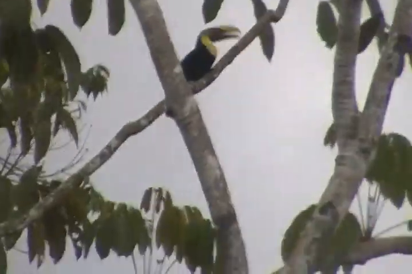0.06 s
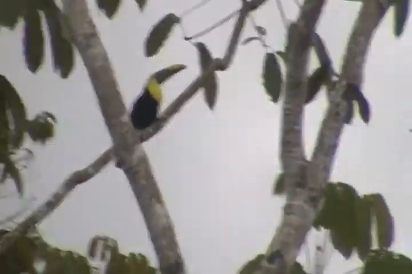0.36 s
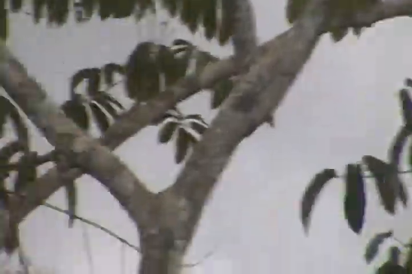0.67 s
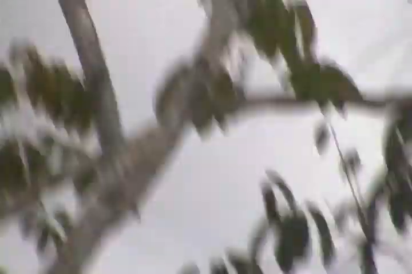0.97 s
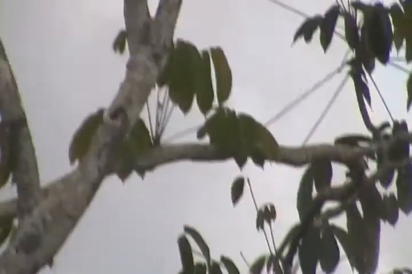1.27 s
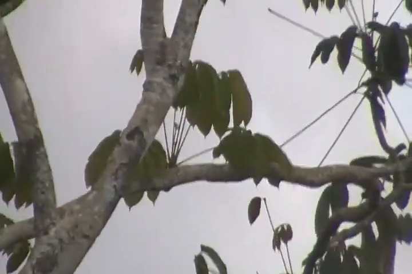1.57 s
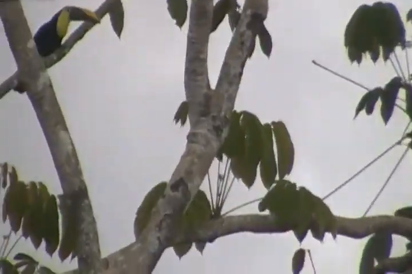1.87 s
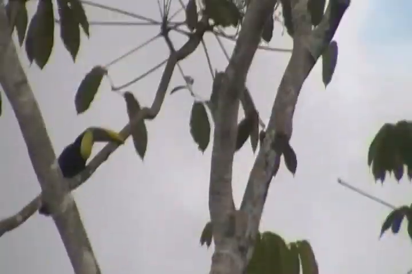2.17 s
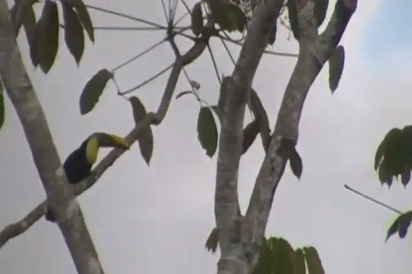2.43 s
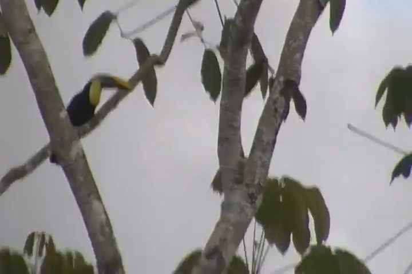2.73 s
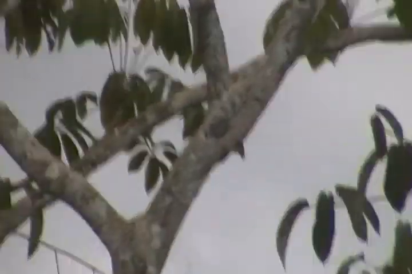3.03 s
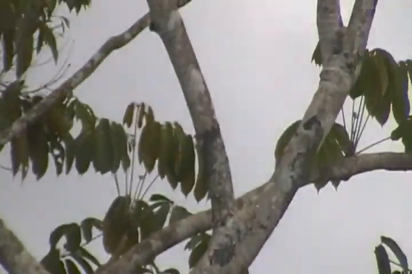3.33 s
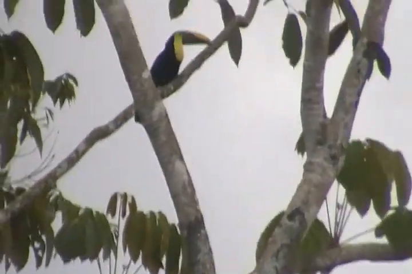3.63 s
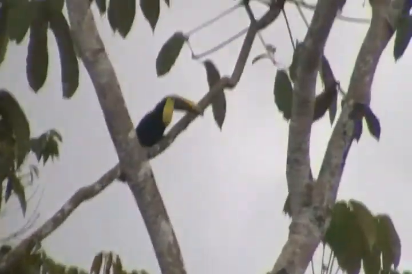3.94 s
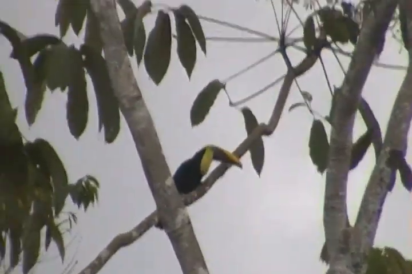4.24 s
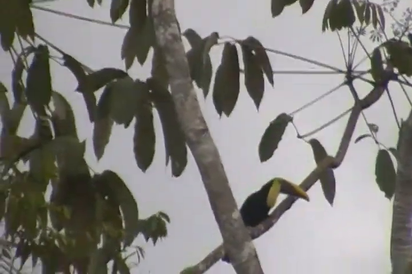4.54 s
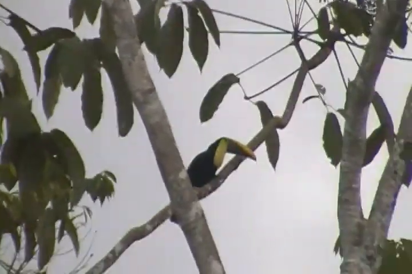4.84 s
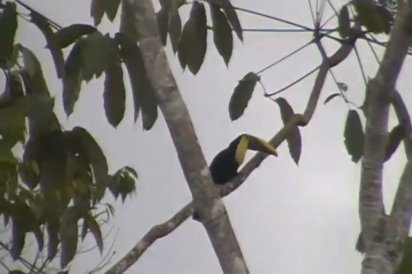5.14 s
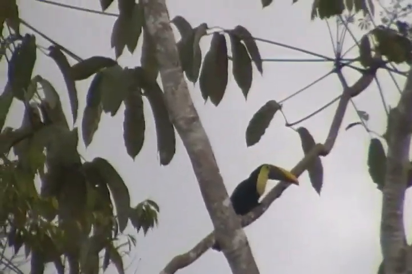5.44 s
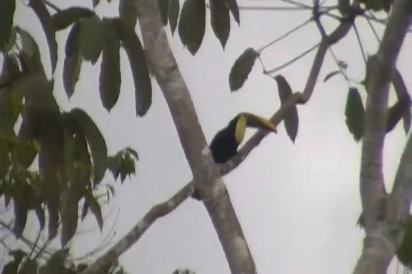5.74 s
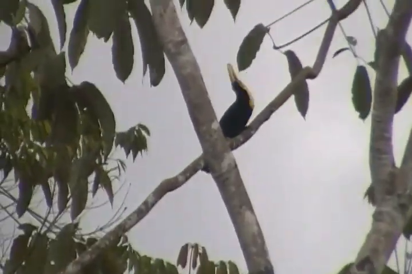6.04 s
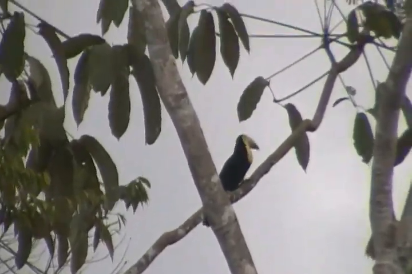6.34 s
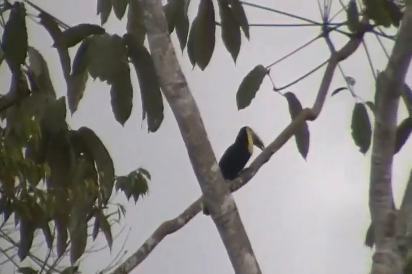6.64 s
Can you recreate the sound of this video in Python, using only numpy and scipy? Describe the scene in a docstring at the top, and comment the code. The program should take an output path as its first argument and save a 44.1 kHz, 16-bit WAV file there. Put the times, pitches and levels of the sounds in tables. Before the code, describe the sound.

Outdoors among trees, a steady deep rush, a faint engine-like drone and a thin insect hiss lie under two loud toucans in front of the microphone. They call in three phrases of yelps, wails and quick yips, with occasional bill snaps and a short echo. A far rooster crows as the first phrase trails off, then a small bird gives two faint whistles just before the second phrase.

```python
"""Two toucans yelp in a treetop, a higher and a lower voice overlapping in three bursts of notes.
Each note is a tone from the syrinx (a bird's voice box) that turns rough as it falls. Bills snap,
and trunks and leaves scatter the sound back. Far off, a rooster crows and a small bird whistles twice.
Under it all lie a steady outdoor rush, a low engine-like drone and a thin band of insects."""
import sys
import numpy as np
from scipy import signal
from scipy.fft import rfft, irfft
from scipy.io import wavfile
from scipy.ndimage import uniform_filter1d, minimum_filter1d

SR = 44100
rng = np.random.default_rng(int(sys.argv[2]) if len(sys.argv) > 2 else 0)


def wav_record(signal):
    """Record a signal, one row per channel, as 16-bit PCM in the file named by sys.argv[1]."""
    frames = np.transpose(np.atleast_2d(signal))
    bounded = np.clip(frames, -1, 1)
    # unit amplitude maps onto the largest positive 16-bit level
    quanta = np.round(bounded * 32767).astype(np.int16)
    wavfile.write(sys.argv[1], SR, quanta)


N = 299880
TIME = np.arange(N) / SR

# The bright noise of breath and of bill snaps. Each row: frequency in Hz, level in dB.
HISS_COLOUR = [(1500, -10), (3500, 8.5), (7800, 3), (12000, -49)]


def undb(db):
    """Turn decibels into a factor to multiply by."""
    return 10 ** (np.asarray(db) / 20)


def unit(x):
    """Scale a signal to an average strength (rms) of 1."""
    return x / np.sqrt(np.mean(x ** 2))


def db_at(hz, points):
    """Read the level at a frequency from a curve of (Hz, dB) points."""
    point_hz, db = np.transpose(points)
    return np.interp(np.log(np.maximum(hz, 1)), np.log(point_hz), db)


def colour(x, points):
    """Make each frequency louder or softer along a curve of (Hz, dB) points."""
    size = x.shape[-1]
    return irfft(rfft(x) * undb(db_at(np.fft.rfftfreq(size, 1 / SR), points)), size)


def wander(rate, size=N):
    """A smooth random wobble, about 1 in size, that takes a new value `rate` times a second."""
    steps = np.arange(size) / SR * rate
    knots = 1.15 * rng.standard_normal(N // 100)
    i = steps.astype(int) % (len(knots) - 1)
    part = steps % 1
    return knots[i] + np.diff(knots)[i] * part * part * (3 - 2 * part)


def stereo(mid, side):
    """Make left and right from what they share (mid) and how they differ (side)."""
    return np.array([mid + side, mid - side])


def add(track, start, sound):
    """Mix a sound into a track at `start` seconds."""
    i = int(start * SR)
    track[i:i + len(sound)] += sound[:N - i]


def outdoor_rush(level_db=-36):
    """Steady, deep noise that spreads wider toward the treble."""
    # Each row: frequency in Hz, level of the noise in dB.
    rush_colour = [(22, -16), (45, -2), (100, -2.5), (130, -9), (350, -15.5), (950, -23.5), (5500, -36),
                   (8000, -36.5), (11500, -45), (12600, -62)]
    # Each row: frequency in Hz, level of the side against the mid in dB.
    width = [(100, -21), (500, -11), (2000, -5.5), (6000, -5), (12000, -0.5)]
    mid, side = colour(rng.standard_normal((2, N)), rush_colour)
    return unit(stereo(mid, colour(side, width))) * undb(level_db)


def drone(waver_db=2, drift=0.0185):
    """Two low tones waver in level and pitch, like an engine."""
    # Each row: pitch in Hz, level in dB.
    tones = [(49.5, -46.5), (86.1, -44.5)]
    out = np.zeros(N)
    for hz, db in tones:
        gain = undb(db + waver_db * wander(7.6))
        phase = 2 * np.pi * np.cumsum(hz * (1 + drift * wander(5))) / SR
        out += gain * unit(np.sin(phase))
    return out


def insects(level_db=-53):
    """An insect chorus blends into a thin, high, flickering band of noise."""
    # Each row: frequency in Hz, level in dB.
    band = [(5600, -28), (6620, -8), (6731, 0), (6840, -7), (8300, -26)]
    return unit(colour(rng.standard_normal((2, N)), band)) * undb(level_db + 2 * wander(20))


def rasp(start_s=0.15, rise_s=0.018, decay_s=0.022, level_db=-25):
    """A short, toneless rasp comes before the first note."""
    # Each row: frequency in Hz, level in dB.
    rasp_colour = [(1500, -30), (2600, -9), (5700, 6.5), (6800, -5.5), (9000, -33.5)]
    out, t = np.zeros(N), TIME[:SR // 2]
    envelope = np.minimum(t / rise_s, 1) * np.exp(-np.maximum(t - rise_s, 0) / decay_s)
    noise = unit(colour(rng.standard_normal(len(t)), rasp_colour))
    add(out, start_s, undb(level_db) * envelope * noise)
    return out


def toucan_note(glide, effort, length, pitch_hz, level_db, second_db, third_db, upper_db, swell_db,
                depth=1, bloom_db=0, attack_s=0.0062, release_s=0.012, crack_s=0.0027, rattle_s=0.04):
    """The syrinx cracks into tone, runs clean while taut, and rattles and hisses as it goes slack."""
    # How throat and bill colour the tone. Each row: frequency in Hz, gain in dB.
    throat = [(900, -19), (1200, 1.5), (1500, 4), (2100, -9.5), (2450, -5.5), (2850, -7), (3150, 1),
              (3500, -9.5), (3900, -2), (4350, -0.5), (5100, -9), (5800, -6), (8500, -24), (12000, -49)]
    t = np.arange(int((length + release_s) * SR)) / SR
    progress = t / length
    knots, *columns = np.hstack([glide, effort]).T
    ratio, effort_db, overtone_db = (np.interp(progress, knots, column) for column in columns)
    fall = np.clip((1 - ratio) / .15, 0, 1)
    # The deeper the final fall, the rougher the end.
    end_rattle = fall[-1] * np.clip(1 + (t - length) / rattle_s, 0, 1)
    slack = end_rattle + .5 * np.exp(-t / crack_s)
    jitter = (.005 + .019 * slack) * wander(600, len(t))
    hz = pitch_hz * ratio ** depth * (1 + jitter)
    phase = 2 * np.pi * np.cumsum(hz) / SR
    harmonics_db = [0, overtone_db + second_db, overtone_db + third_db + bloom_db * fall]
    # The top five harmonics grow as the rattle sharpens the pulses.
    harmonics_db += [overtone_db + upper_db + 5 * slack] * 5
    tone = 0
    for k, harmonic_db in enumerate(harmonics_db, 1):
        # As the head swings, the highest harmonics fade in and out the most.
        swing_db = 2 * np.sqrt(k - 1) * wander(40.9, len(t))
        # Overtones slip out of step with the lowest tone, more so when slack.
        slip = (k - 1) * (.07 + .17 * slack ** 2) * wander(900, len(t))
        tone += undb(harmonic_db + swing_db + db_at(k * hz, throat)) * np.sin(k * phase + slip)
    tone *= undb(level_db + effort_db + swell_db * (progress - .5))
    envelope = np.clip(t / attack_s, 0, 1) * np.clip((t[-1] - t) / release_s, 0, 1)
    # The rattle shakes the level and weakens the note.
    shake_db = (0.32 + 2.6 * slack) * wander(450, len(t)) - 5 * slack ** 2
    # Air escapes once a cycle, most in notes with strong upper harmonics.
    puffs = rng.standard_normal(len(t)) * (1 + np.sin(phase))
    hiss = unit(colour(puffs, HISS_COLOUR)) * undb(-39 + 5 * slack + upper_db / 2)
    return envelope * undb(shake_db) * (tone + hiss)


def toucans(gain_db=-1):
    """Two voices call in five kinds of note, each kind with its own path of pitch and effort."""
    # Each row: start in seconds, length in seconds, pitch in Hz, then in dB: relative level,
    # second harmonic, third harmonic, upper harmonics, swell over the note.
    yaps = [(0.242, 0.068, 1938, -11, 1, -13, -20, 3.1), (3.207, 0.07, 1947, -7.5, 1.5, -17, -12.5, 6.8),
            (6.111, 0.061, 1936, -12.5, 3, -10, -12.5, 0.84)]  # drooping notes that open a phrase of the higher voice
    whistles = [(0.32, 0.11, 2034, -10, -0.7, -12, -25, 1.5), (3.283, 0.13, 2027, -13.5, -3.5, -12, -40, 0),
                (6.187, 0.126, 2016, -11, 0.7, -10, -14, -1)]  # held notes of the higher voice
    yelps = [(0.479, 0.063, 2170, -4, -4.5, -19, -18, -10), (0.916, 0.068, 1582, -16.5, 12, 9.5, -5, -2),
             (3.447, 0.078, 2143, -7.5, -9, -13, -31, -12), (3.478, 0.07, 1551, -16.5, 13, 3.5, -7, -4.5),
             (5.507, 0.088, 1529, -15, 4, -7.5, -16.5, -9.5),
             (6.36, 0.077, 2112, -12.5, -5.5, -11.5, -8, -3), (6.522, 0.1, 1482, -26.5, 21.5, -1, -5, 2.5)]  # arched notes
    yips = [(0.98, 0.043, 1732, -16, 7.7, -5, -3, -11.5), (1.065, 0.082, 1712, -14, 0.74, -5.5, -19, -17.5),
            (1.228, 0.044, 1554, -19.5, 14.4, 6, 4.5, -9.5), (1.338, 0.055, 1565, -21, 14, 4.5, 2.5, -14.5),
            (1.484, 0.023, 1485, -21, 14.5, 7.5, 3.5, -8), (1.741, 0.027, 1440, -21, 13.8, 6.5, 1.5, -6.5),
            (1.837, 0.048, 1524, -19, 13, 2.5, -1.5, -6.5), (3.79, 0.046, 1530, -21.5, 15.1, 6.5, -0.5, -8),
            (3.897, 0.056, 1563, -19, 13.6, 3, -2, -12), (3.965, 0.058, 1750, -18.5, 8.5, -5, -12, -24),
            (4.075, 0.081, 1695, -13, 2.5, -7.5, -23.5, -19), (5.823, 0.049, 1506, -24.5, 14.1, -1, -6, -3),
            (5.93, 0.061, 1530, -21, 9.3, -2.5, -8.5, -8.5), (6.068, 0.036, 1490, -25, 16, -1, -6.5, -9.5),
            (6.472, 0.043, 1407, -24.5, 13.6, 2.5, -7.5, 0)]  # short falling notes
    # These rows add: depth of the glide (1 is usual), boost of the third harmonic after the break in dB.
    wails = [(0.682, 0.2, 1733, -17, 3, -22.5, -17, -10.5, 1.02, 18.5),
             (3.245, 0.21, 1721, -17, 0, -13, -16, -12.5, 1.11, 4),
             (5.29, 0.192, 1690, -18.5, 2, -12, -14, -14.5, 0.94, 1.5)]  # long notes that break down to a lower pitch
    # How the pitch moves. Each row: place in the note from 0 to 1, pitch ratio.
    yap_glide = [(0, .972), (.25, 1), (.6, .985), (1, .865)]
    whistle_glide = [(0, 1), (.25, .981), (.55, .97), (.8, .955), (1, .922)]
    yelp_glide = [(0, .955), (.25, .994), (.55, .998), (.8, .97), (1, .875)]
    yip_glide = [(0, 1), (.2, .986), (.5, .96), (.75, .905), (1, .83)]
    wail_glide = [(0, .982), (.1, .997), (.25, 1), (.39, .862), (.55, .836), (.85, .823), (1, .76)]
    # How hard the bird pushes at each point of the glide. Each row: level in dB, overtones in dB.
    yap_effort = [(-0.5, 2.9), (0, -1.6), (-0.5, -0.5), (4, -2.6)]
    whistle_effort = [(0.5, 0.5), (3, -7.5), (7.5, -7.5), (3, -11.5), (-6.5, 3.5)]
    yelp_effort = [(-6.5, -0.5), (5.5, -6.5), (4, -8.5), (2, -1), (2, -5)]
    yip_effort = [(-14.5, 7.5), (2, -6.5), (-3.5, 0.5), (-3, 6), (6, -8)]
    wail_effort = [(-4.5, 11), (4.5, 7), (2.5, 10), (1, -5.5), (1, 2.5), (5.5, 3), (12, -2)]
    kinds = [(wails, wail_glide, wail_effort),
             (yaps, yap_glide, yap_effort),
             (yelps, yelp_glide, yelp_effort),
             (whistles, whistle_glide, whistle_effort),
             (yips, yip_glide, yip_effort)]
    out = np.zeros(N)
    for notes, glide, effort in kinds:
        for start, *shape in notes:
            add(out, start, toucan_note(glide, effort, *shape))
    return undb(gain_db) * out


def tree_echoes(sound, echo_db, near_s=0.18, far_s=0.52, delay_s=0.0082):
    """Nearby trunks scatter the sound, the wood behind adds a longer tail, and leaves soak up treble."""
    t = TIME[:SR]
    arrived = np.clip(t / delay_s - 1, 0, 1)
    near, far = (unit(arrived * undb(-60 * t / fade_s)) for fade_s in (near_s, far_s))
    echoes = rng.standard_normal((2, SR)) * np.hypot(undb(1) * near, far) / np.sqrt(SR)
    dulled = colour(echoes, [(1500, -0.92), (3200, -3.0), (8000, -8)])
    mid, side = (signal.fftconvolve(sound, echo)[:N] for echo in dulled)
    return undb(echo_db) * stereo(mid, undb(-7) * side)


def bill_snaps():
    """A bill snaps with a dry burst of bright noise, alone or at the start of a hard note."""
    # Each row: start in seconds, decay time in seconds, level in dB.
    snaps = [(0.615, 0.0015, -24.5), (0.922, 0.0075, -22), (5.291, 0.0094, -21)]
    out, t = np.zeros(N), TIME[:SR // 2]
    for start, decay_s, db in snaps:
        noise = unit(colour(rng.standard_normal(len(t)), HISS_COLOUR))
        add(out, start, undb(db) * np.exp(-t / decay_s) * noise)
    return out


def rooster(gain_db=-3, jitter=0.03, bloom_db=5.5, nasal_db=-12, attack_s=0.0078, release_s=0.0248):
    """A far rooster crows: hoarse syllables, and one long clean note that grows ever more nasal."""
    # Each row: start in seconds, length in seconds, pitch in Hz, relative level in dB,
    # roughness from 0 to about 1.
    syllables = [(0.975, 0.065, 651, -39, 0.4), (1.181, 0.042, 809, -30.5, 0.56),
                 (1.32, 0.12, 820, -35, 0.65), (1.376, 0.11, 904, -25, 0.4), (1.551, 0.252, 905, -26, 1.02),
                 (2.048, 0.32, 867, -31.5, 0.04), (2.395, 0.028, 820, -34.5, 0.55)]
    # Two tone colours to blend, lowest harmonic first. Each row: clean level in dB, hoarse level in dB.
    harmonics = [(2, -0.5), (0, -13), (-15, -9), (-8, -10.5), (-35, -45), (-10, -20), (-16, -18)]
    out = np.zeros(N)
    for start, length, pitch_hz, db, rough in syllables:
        t = np.arange(int((length + release_s) * SR)) / SR
        # The pitch starts a little high, settles, sags and gives way at the end.
        overshoot = 0.0268 * np.exp(-t / 0.059)
        end_drop = 0.064 * np.exp((t - t[-1]) / 0.0264)
        hz = pitch_hz * (1 + overshoot - 0.01 * t - end_drop)
        phase = 2 * np.pi * np.cumsum(hz * (1 + jitter * rough * wander(222, len(t)))) / SR
        progress = t / t[-1]
        hoarse = np.clip(rough / 0.33, 0, 1)
        # Overtones bloom in mid-syllable; the lowest tone fades when the voice is clean.
        arch_db = bloom_db * np.sin(np.pi * progress)
        thinning_db = nasal_db * np.sqrt(progress) * (1 - hoarse)
        tone = 0
        for k, (clean_db, hoarse_db) in enumerate(harmonics, 1):
            blend_db = clean_db * (1.5 - hoarse) + hoarse_db * hoarse
            tone += undb(blend_db + (arch_db if k > 1 else thinning_db)) * np.sin(k * phase)
        envelope = np.clip(t / attack_s, 0, 1) * np.clip((t[-1] - t) / release_s, 0, 1)
        flutter_db = 2 * rough * wander(126.8, len(t))
        add(out, start, tone * envelope * undb(gain_db + db + flutter_db))
    return out


def songbird(level_db=-51, length_s=0.12, rise=0.027):
    """A small bird far off gives two thin, slightly rising whistles."""
    out, t = np.zeros(N), TIME[:int(length_s * SR)]
    for start, hz in [(2.91, 3750), (3.12, 3800)]:
        phase = 2 * np.pi * np.cumsum(hz * (1 + rise * t / length_s)) / SR
        add(out, start, undb(level_db) * np.sin(np.pi * t / length_s) * np.sin(phase))
    return out


def scene(side_db=-3, side_delay_s=0.001065):
    """The toucans call straight ahead, with the other birds, the echoes and the background around them."""
    calls = toucans() + rasp() + bill_snaps()
    crow = rooster()
    # A very short echo makes left and right differ, more so toward the treble.
    side = colour(calls, [(1500, -25.5), (4000, -12.0), (8000, -1.0)])
    side = np.roll(side, int(side_delay_s * SR))
    direct = stereo(calls, undb(side_db) * side) + crow + songbird()
    echoes = tree_echoes(calls, echo_db=-7.5) + tree_echoes(crow, echo_db=-5.5)
    lean_left = undb([[.6], [-.6]])
    return direct + echoes + (outdoor_rush() + drone()) * lean_left + insects()


def record(dry, hold_s=0.13, ease_s=0.042, top_hz=12600):
    """A limiter turns everything down around peaks that are too loud; the highest treble is cut off."""
    peak = np.maximum(np.abs(dry).max(axis=0), 1e-9)
    safe_gain = np.minimum(1, 1 / peak)
    held_gain = minimum_filter1d(safe_gain, int(hold_s * SR) + 1)
    gain = uniform_filter1d(held_gain, int(ease_s * SR) + 1)
    treble_cut = signal.ellip(8, .1, 60, top_hz, fs=SR, output="sos")
    return signal.sosfilt(treble_cut, dry * gain)


dry = scene()
out = record(dry)
wav_record(out)
```